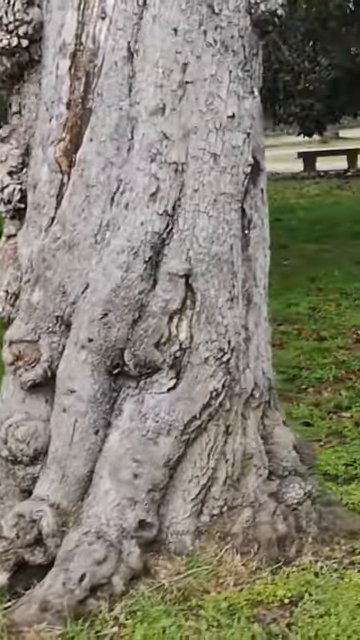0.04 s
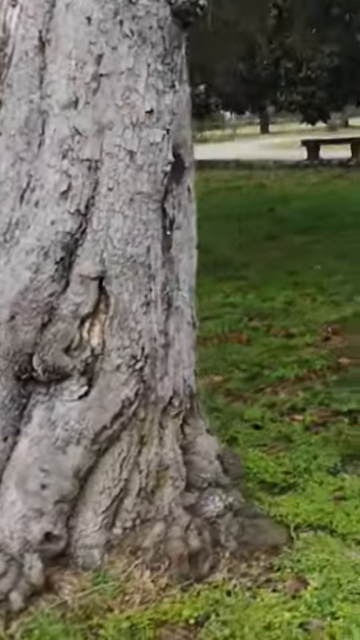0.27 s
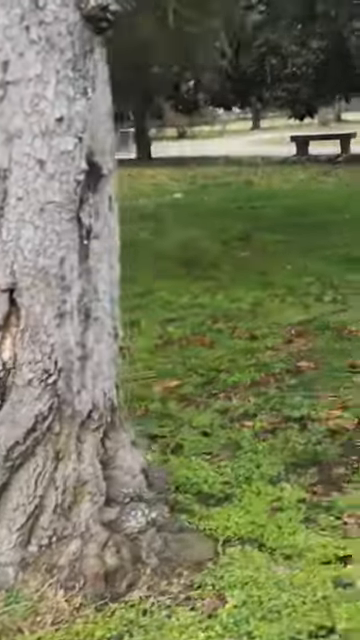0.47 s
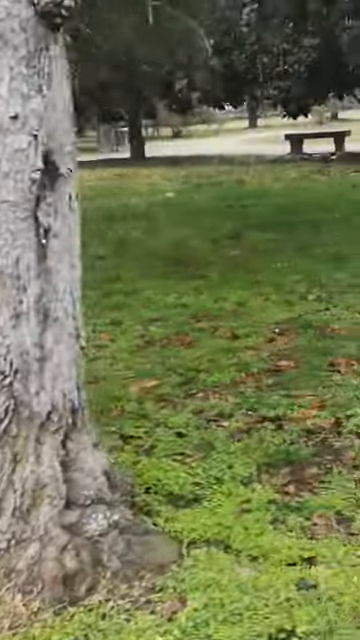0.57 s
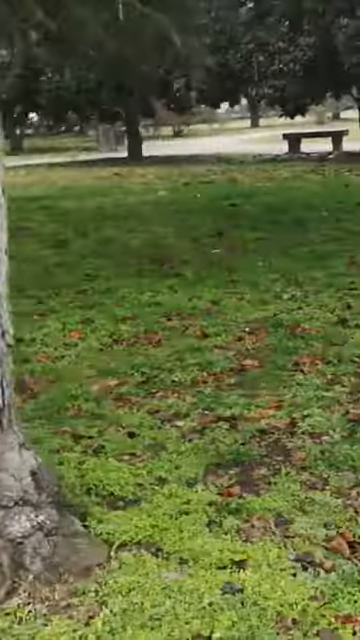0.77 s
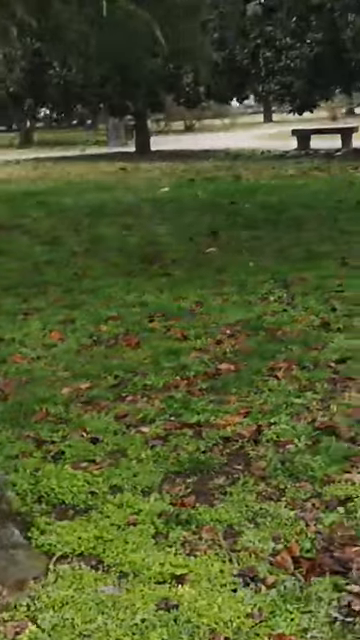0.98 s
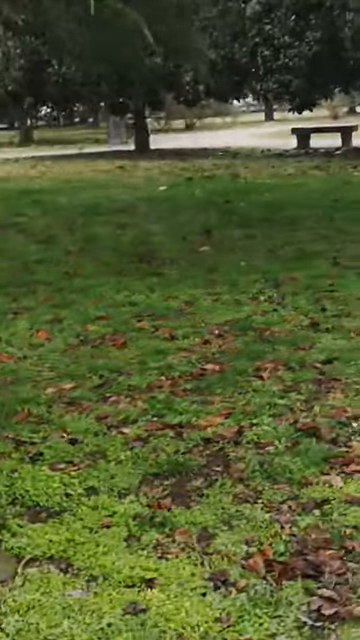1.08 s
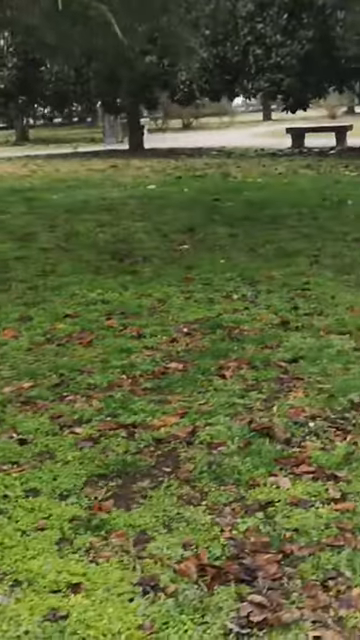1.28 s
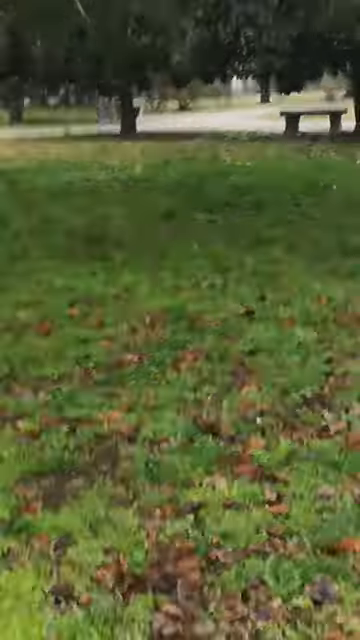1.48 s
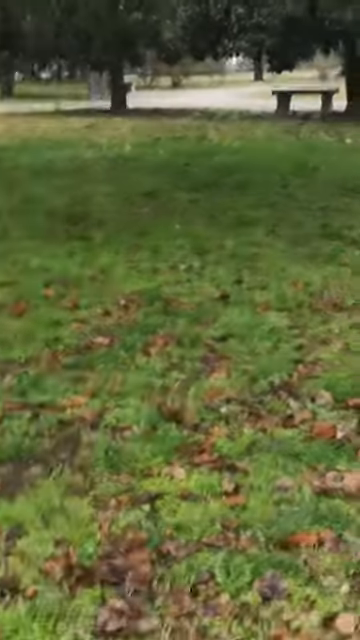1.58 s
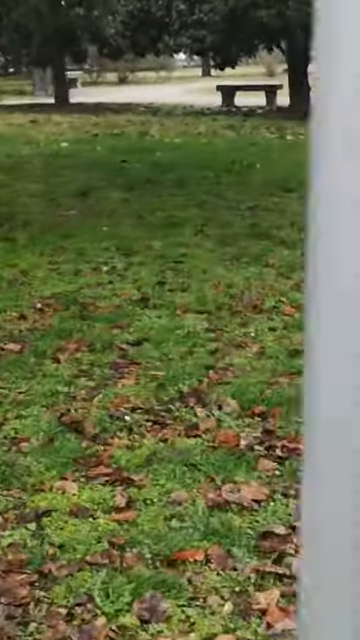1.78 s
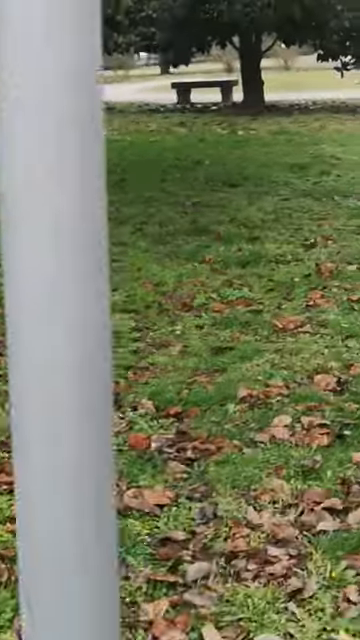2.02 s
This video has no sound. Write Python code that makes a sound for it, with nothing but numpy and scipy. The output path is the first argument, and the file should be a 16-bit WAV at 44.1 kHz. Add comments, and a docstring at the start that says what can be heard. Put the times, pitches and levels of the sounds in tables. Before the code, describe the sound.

Three short crunching footsteps on grass and fallen leaves, with low wind rumble.

```python
"""Three steps over grass and fallen leaves in a quiet park, heard at a microphone the walker carries.
A thin hiss opens the scene over the park's faint wash, and gusts begin to rumble on the microphone.
Near 0.3, 0.9 and 1.6 s a shoe swishes through the grass, crunches down on its heel with a dull thud
and rolls onto its sole, while stalks and twigs snap. The wind is strongest just after the first heel
and swells again after the third; a tiny chirp comes near the end."""
import sys
import numpy as np
from scipy import signal
from scipy.fft import rfft, irfft
from scipy.io import wavfile
from scipy.ndimage import uniform_filter1d

SR = 44100
rng = np.random.default_rng(int(sys.argv[2]) if len(sys.argv) > 2 else 0)


def bounce(signal):
    """Save signal as a 16-bit WAV file at the path given by the first command-line argument."""
    frames = np.transpose(np.atleast_2d(signal))
    limited = np.clip(frames, -1, 1)
    pcm = np.round(limited * 32767).astype(np.int16)
    wavfile.write(sys.argv[1], SR, pcm)


N = 90404
T, HZ = np.arange(N) / SR, np.fft.rfftfreq(N, 1 / SR)
FRONT_LAG_MS = 0.2203  # a foot ahead reaches the right microphone port first

# spectra of brushed grass and of crushed leaves: frequency_hz, gain_db
GRASS_SPECTRUM = [(200, -7), (600, -12), (1100, -2), (1800, 8), (3000, -1.5), (5000, -6), (7700, -9.5),
                  (9000, -18.5), (12000, -24.5), (15500, -51)]
CRUNCH_SPECTRUM = [(200, -18), (650, -38), (1100, -5.5), (1850, 3.5), (2900, -5.5), (5400, -13),
                   (7500, -15.5), (9500, -33), (12000, -51.5), (15500, -51)]
# likeness of low rumble at the two ports: frequency_hz, coherence
RUMBLE_COHERENCE = [(40, 1), (120, 0.9), (250, 0.4), (500, 0.1)]


def amp(db):
    """Amplitude grows tenfold for every 20 dB."""
    return 10 ** (np.asarray(db) / 20)


def unit_rms(x):
    """Normalisation to a mean power of one."""
    return x / np.sqrt(np.mean(x ** 2) + 1e-20)


def at_bins(points):
    """Interpolation over log frequency gives a value at every bin."""
    hz, value = np.transpose(points)
    return np.interp(np.log(HZ + 1), np.log(hz + 1), value)


def coloured(x, spectrum):
    """Spectral shaping to unit rms, falling 24 dB an octave above the last point."""
    above = np.maximum(HZ / spectrum[-1][0], 1)
    return unit_rms(irfft(rfft(x) * amp(at_bins(spectrum)) / above ** 4, N))


def noise_pair(coherence):
    """Partial coherence: two ports share part of their white noise."""
    left, independent = rfft(rng.standard_normal((2, N)))
    shared = np.clip(at_bins(coherence), -1, 1)
    right = shared * left + np.sqrt(1 - shared ** 2) * independent
    return irfft(np.array([left, right]), N)


def placed(x, lag_ms, pan_db):
    """Time and level differences give direction: the left port is lag_ms later and pan_db louder."""
    late = irfft(rfft(x) * np.exp(-2j * np.pi * HZ * lag_ms / 1000), N)
    return np.array([late * amp(pan_db / 2), x * amp(-pan_db / 2)])


def swells(rows):
    """Envelopes with a Gaussian rise and an exponential decay add in power."""
    power = np.zeros(N)
    for peak_s, rise_s, fall_s, level_db in rows:
        t = T - peak_s
        power += (amp(level_db) * np.exp(-np.where(t < 0, (t / rise_s) ** 2, t / fall_s))) ** 2
    return np.sqrt(power)


def crackle(spectrum, per_s, spread_db, pan_db, scatter, lag_ms=FRONT_LAG_MS):
    """Shot noise: tiny fractures of uneven size arrive directly and scattered by the grass."""
    sizes = amp(spread_db * np.minimum(rng.exponential(1, N), 3.5))
    fractures = sizes * rng.choice([-1, 1], N) * (rng.random(N) < per_s / SR)
    direct = placed(unit_rms(fractures), lag_ms, pan_db)
    return coloured(direct + scatter * rng.standard_normal((2, N)), spectrum)


def twig_snaps():
    """Brittle fracture: each stalk or twig gives a tick, a damped ring and a short shiver of leaves."""
    # breaks: peak_s, level_db, pitch_hz, lag_ms, pan_db
    breaks = [(.2895, -30, 2600, 0.21, -4), (.3125, -28, 1800, 0.24, -8), (0.337, -28.5, 2400, 0.0042, -2),
              (0.3621, -35.5, 2250, 0, -4), (0.4225, -36.5, 1973, 0.16, -4.5), (0.616, -35, 1780, .18, -1),
              (.682, -37.5, 1640, 0.081, -1), (0.8146, -36, 1460, 0.11, -2), (.832, -41, 2116, 0.026, 0),
              (0.839, -33.5, 2170, 0.054, -4), (.8642, -35, 2070, .05, -6), (.928, -32, 1400, 0.21, -16),
              (.9317, -15, 1450, 0.27, -2), (.940, -29.5, 3860, 0.3, -15), (.9417, -30, 1590, 0.044, -5),
              (.9647, -33, 2080, 0.064, 2), (.9806, -24, 1820, 0.057, -2), (1.5633, -28, 2140, 0.203, -1),
              (1.5708, -29, 2274, 0.18, -3), (1.5872, -36, 2200, 0.25, 4), (1.639, -43, 2200, 0.029, -2),
              (1.9123, -45, 2600, 0.19, -8), (1.9323, -45.5, 3020, 0.18, -8.5)]
    # filter over all the snaps: frequency_hz, gain_db
    spectrum = [(100, -19), (800, -3), (5000, 3.5), (7000, -3), (9000, -15), (12000, -19.5), (15500, -23.5)]
    rise_cycles, fall_cycles = 0.45, 0.8
    tick_db, tick_decay_s, shiver_db, shiver_decay_s = -14.5, 0.0004, -24.5, 0.0023
    tick_noise = coloured(rng.standard_normal(N), GRASS_SPECTRUM)
    leaf_noise = coloured(rng.standard_normal((2, N)), CRUNCH_SPECTRUM)
    out = np.zeros((2, N))
    for peak_s, level_db, pitch_hz, lag_ms, pan_db in breaks:
        age_s, broken = np.maximum(T - peak_s, 0), T > peak_s
        cycles = (T - peak_s) * pitch_hz
        envelope = np.exp(-np.where(broken, cycles / fall_cycles, (cycles / rise_cycles) ** 2))
        # a small stalk radiates little below about half its pitch
        radiation = 1 - np.exp(-(HZ / (0.48 * pitch_hz)) ** 2)
        ring = irfft(rfft(envelope * np.cos(2 * np.pi * cycles)) * radiation, N)
        tick = broken * amp(tick_db) * tick_noise * np.exp(-age_s / tick_decay_s)
        shiver = broken * amp(shiver_db) * leaf_noise * np.exp(-age_s / shiver_decay_s)
        out += amp(level_db) * (placed(ring + tick, lag_ms, pan_db) + shiver)
    return irfft(rfft(out) * amp(at_bins(spectrum)), N)


def heel_crunches():
    """Compression under the heel fractures leaves in a short burst."""
    # heel strikes: peak_s, rise_s, fall_s, level_db
    strikes = [(.312, 0.014, 0.013, -39.5), (.933, 0.0073, .011, -37), (1.575, 0.012, 0.02, -43)]
    return swells(strikes) * crackle(CRUNCH_SPECTRUM, per_s=1500, spread_db=5, pan_db=-0.4, scatter=0.46)


def heel_thuds(rise_s=0.0029):
    """A heavily damped impact: the soil gives a dull puff under each heel."""
    # impacts: peak_s, level_db, fall_s
    impacts = [(0.306, -46.5, .01), (0.9304, -39.5, 0.0047), (1.572, -53.5, 0.018)]
    # spectrum of the soil: frequency_hz, gain_db
    spectrum = [(50, -3), (120, 5.5), (250, 0.5), (450, 0), (700, -4), (950, 4), (1500, -9), (3000, -28)]
    envelope = swells([(peak_s, rise_s, fall_s, level_db) for peak_s, level_db, fall_s in impacts])
    return placed(envelope * coloured(rng.standard_normal(N), spectrum), lag_ms=0.35, pan_db=-6.5)


def grass_swishes():
    """Friction between shoe and grass makes clicks dense enough to merge into a swish."""
    # strokes of the shoe: peak_s, rise_s, fall_s, level_db
    strokes = [(.232, .01, 0.056, -53), (.29, 0.043, 0.062, -46), (.76, 0.01, .01, -57),
               (.862, 0.017, 0.017, -49), (.91, 0.028, 0.086, -52), (1.508, 0.011, 0.0073, -52.5),
               (1.56, 0.057, 0.081, -53.5)]
    return swells(strokes) * crackle(GRASS_SPECTRUM, per_s=3800, spread_db=7, pan_db=-4, scatter=0.94)


def sole_rolls():
    """Gradual loading as the sole rolls down draws a softer crackle from the leaves."""
    # rolls: peak_s, rise_s, fall_s, level_db
    rolls = [(.365, 0.024, 0.027, -50), (.972, 0.02, 0.036, -51.5), (1.636, 0.03, 0.05, -52.5)]
    # spectrum of leaves under the sole: frequency_hz, gain_db
    spectrum = [(300, -18.5), (800, -12.5), (1200, -14.5), (2300, -2), (2800, -6), (3500, -20),
                (7500, -22.5), (10000, -42), (15000, -46)]
    leaves = crackle(spectrum, per_s=1000, spread_db=3.5, pan_db=-1.8, scatter=0.89, lag_ms=0.0105)
    return swells(rolls) * leaves


def leaf_flicks():
    """Impulsive excitation: dry leaves flicked by the shoe give brief, bright bursts."""
    # flicks: peak_s, rise_s, fall_s, level_db
    flicks = [(.226, 0.0018, .004, -60), (.248, 0.0017, 0.003606, -47), (.308, 0.006, 0.013, -47.5),
              (.356, .001, 0.001797, -67), (.394, 0.001197, .002, -62), (.541, .001, 0.003023, -62),
              (.576, 0.0024, .003, -60.5), (.855, .002, 0.00438, -60), (.8635, 0.003, 0.0019, -51.5),
              (.892, 0.00092, .0015, -52), (.923, .0007, .0015, -48), (1.491, .001, 0.0029, -54),
              (1.507, 0.0013, 0.0058, -49.5), (1.5637, .0007, .0012, -45.5), (1.5707, 0.00076, 0.0019, -47),
              (1.631, 0.00041, 0.00063, -46.5)]
    # spectrum of a dry leaf: frequency_hz, gain_db
    spectrum = [(500, -16.5), (2000, -1), (4200, 3.5), (7700, -2), (9500, -19), (12000, -23), (15500, -30)]
    return swells(flicks) * crackle(spectrum, per_s=3000, spread_db=0.5, pan_db=-2, scatter=0.97)


def walker_rustle():
    """Diffuse scattering dominates the walker's soft rustle between steps."""
    # movements: peak_s, rise_s, fall_s, level_db
    movements = [(.5, 0.0851, .17, -60.5), (.81, 0.044, 0.034, -62.5), (1.13, 0.031, 0.046, -64.5),
                 (1.47, 0.066, 0.045, -63.5), (1.8, 0.13, 0.091, -59), (2.0, 0.021, 0.0787, -65)]
    # spectrum of the rustle: frequency_hz, gain_db
    spectrum = [(300, -30.5), (900, -4.5), (1900, 0.5), (2600, -9), (3200, -8), (6300, -15.5),
                (7700, -11.5), (9000, -20), (15000, -32.5)]
    rustle = crackle(spectrum, per_s=1400, spread_db=3, pan_db=-5.5, scatter=1.4, lag_ms=0.17)
    return swells(movements) * rustle


def wind():
    """Turbulence: eddies press on the ports, and stronger gusts reach higher in pitch."""
    # gust strength: time_s, level_db
    gusts = [(0, -38.5), (.06, -51), (.09, -49.5), (.16, -50), (.185, -34), (.22, -28.5), (.26, -32),
             (.37, -20.5), (.415, -28), (.46, -26), (.535, -38), (.6, -32), (.64, -46), (.7, -41),
             (.92, -39), (1.08, -45), (1.18, -42.5), (1.23, -50), (1.33, -42), (1.53, -49), (1.58, -39),
             (1.655, -40.5), (1.685, -30), (1.76, -30.5), (1.81, -39), (1.95, -45.5), (2.05, -48.5)]
    # spectra of soft and hard wind: frequency_hz, gain_db
    soft_spectrum = [(12, -38.5), (20, -3.5), (40, 1.5), (85, -5), (150, -17.5), (280, -31), (400, -42.5),
                     (650, -51.5), (1100, -56)]
    hard_spectrum = [(12, -22), (20, -2), (43, 4), (80, 2.5), (120, -1), (170, -11.5), (245, -18),
                     (310, -28.5), (400, -35.5), (550, -47.5), (800, -46), (1200, -55)]
    soft_db, hard_db, trim_db, averaging_s = -40, -31.5, -1, 0.0388
    gust_db = np.interp(T, *np.transpose(gusts))
    hardness = np.clip((gust_db - soft_db) / (hard_db - soft_db), 0, 1)
    eddies = noise_pair(RUMBLE_COHERENCE)
    rumble = (1 - hardness) * coloured(eddies, soft_spectrum) + hardness * coloured(eddies, hard_spectrum)
    # dividing by the running rms lets the gusts alone set the level
    power = uniform_filter1d((rumble ** 2).mean(0), int(averaging_s * SR))
    return amp(gust_db + trim_db) * rumble / np.sqrt(power + 1e-9)


def handling_bumps():
    """Structure-borne sound: the carrying hand passes soft, low bumps to the microphone."""
    # bumps: peak_s, rise_s, fall_s, level_db
    bumps = [(.1, 0.07, .06, -56.5), (.19, 0.023, 0.057, -51), (1.0, 0.023, 0.024, -51),
             (1.49, 0.032, 0.066, -51.5)]
    # spectrum of a bump: frequency_hz, gain_db
    spectrum = [(80, -4.5), (170, 5.5), (240, -2.5), (400, -18.5), (600, -24.5), (1000, -25)]
    return swells(bumps) * coloured(noise_pair(RUMBLE_COHERENCE), spectrum)


def chirp(fall_hz_per_s=12000, octave_db=-17):
    """A linear sweep: a few milliseconds of falling tone and its octave under a Gaussian envelope."""
    # one tiny high note: peak_s, half_width_s, pitch_hz, level_db
    high_note = (1.899, .0035, 6530, -59)
    peak_s, half_width_s, pitch_hz, level_db = high_note
    t = T - peak_s
    phase = 2 * np.pi * (pitch_hz * t - fall_hz_per_s * t ** 2 / 2)
    envelope = amp(level_db) * np.exp(-(t / half_width_s) ** 2)
    tone = np.sin(phase) + amp(octave_db) * np.sin(2 * phase)
    return placed(envelope * tone, lag_ms=0, pan_db=-6)


def opening_hiss():
    """Incoherent noise, strongest near 7 kHz, makes a thin hiss that fades at the first step."""
    # course of the hiss: time_s, level_db
    levels = [(0, -73), (.05, -65), (.18, -63.5), (.25, -61.5), (.35, -100)]
    # spectrum of the hiss: frequency_hz, gain_db
    spectrum = [(4200, -12), (4900, -5.5), (6300, -8), (7100, 4), (7700, -3.5), (8500, -17), (11000, -23.5)]
    return amp(np.interp(T, *np.transpose(levels))) * coloured(rng.standard_normal((2, N)), spectrum)


def park_wash(level_db=-61):
    """A diffuse field: the far wash of the park is alike at both ports in the bass, unlike in the treble."""
    # spectrum of the wash: frequency_hz, gain_db
    spectrum = [(100, 9.5), (220, 7), (330, -4), (500, -10.5), (750, -3.5), (950, 0.5), (1200, -3),
                (1800, 1), (2600, -5.5), (3200, -9.5), (4400, -16.5), (5700, -11.5), (6400, -19),
                (7800, -14), (8600, -24), (10500, -27.5), (15500, -28)]
    # likeness at the two ports: frequency_hz, coherence
    coherence = [(300, 1), (640, 0), (1400, 0.4), (3000, 0), (15000, 0)]
    return amp(level_db) * coloured(noise_pair(coherence), spectrum)


def scene():
    """Superposition: the pressures of steps, wind and background add."""
    leaves = grass_swishes() + heel_crunches() + sole_rolls() + leaf_flicks() + walker_rustle()
    steps = leaves + twig_snaps() + heel_thuds()
    return steps + wind() + handling_bumps() + chirp() + opening_hiss() + park_wash()


def record(dry):
    """Band limiting: a steep low-pass filter removes the highest treble."""
    edge_hz = 15750
    low_pass = signal.firwin(511, edge_hz, window=("kaiser", 9), fs=SR)
    return signal.oaconvolve(dry, low_pass[None], "same")


dry = scene()
out = record(dry)
bounce(out)
```